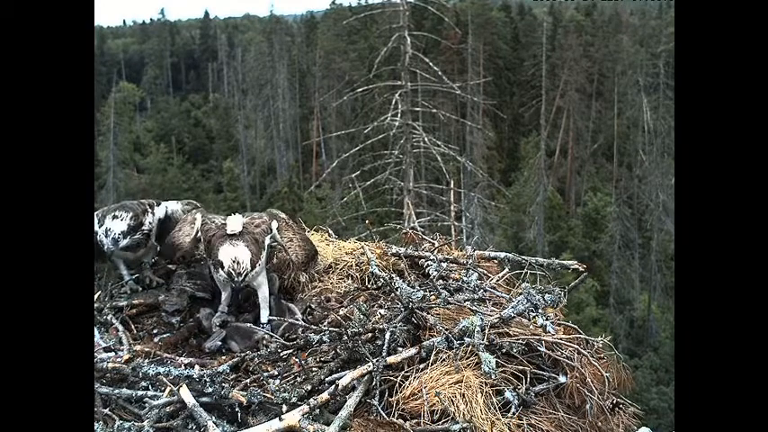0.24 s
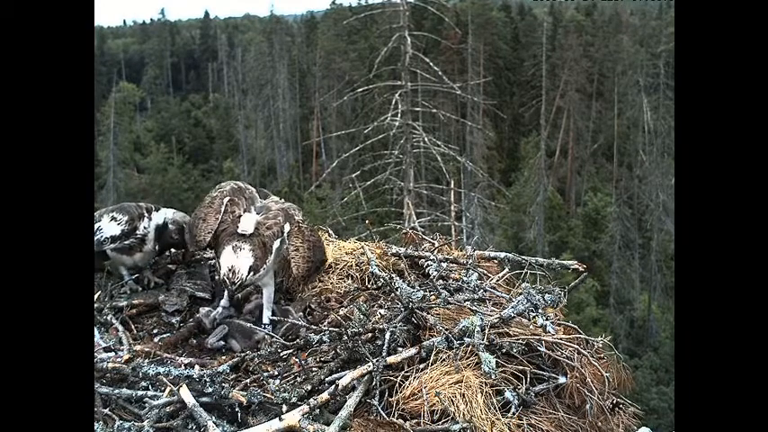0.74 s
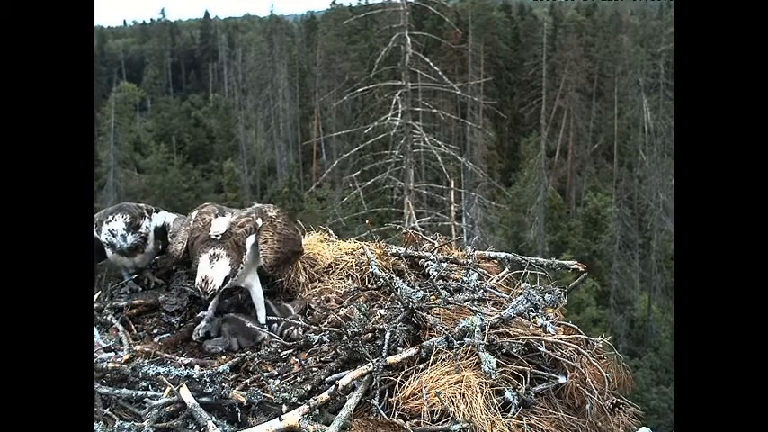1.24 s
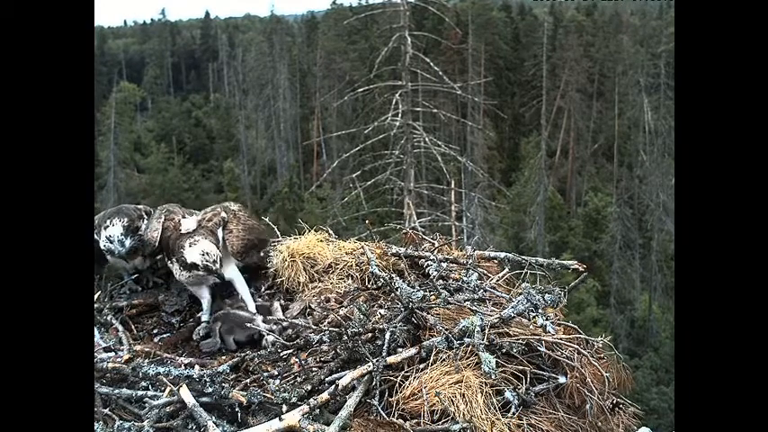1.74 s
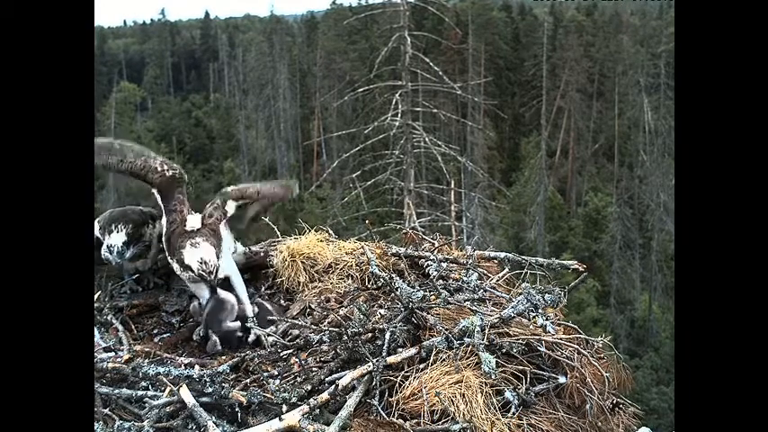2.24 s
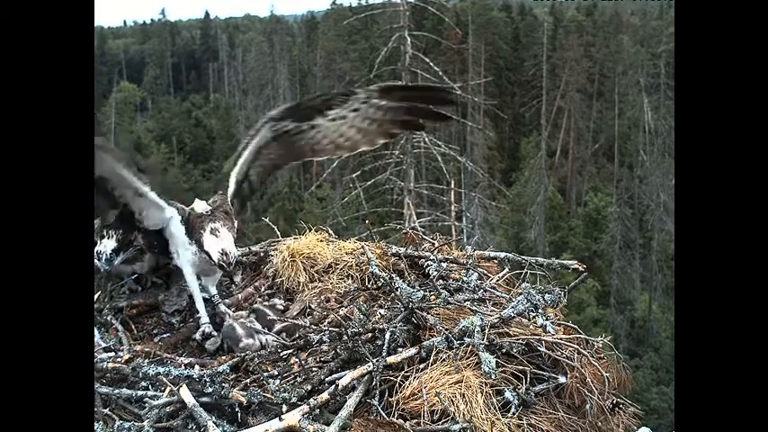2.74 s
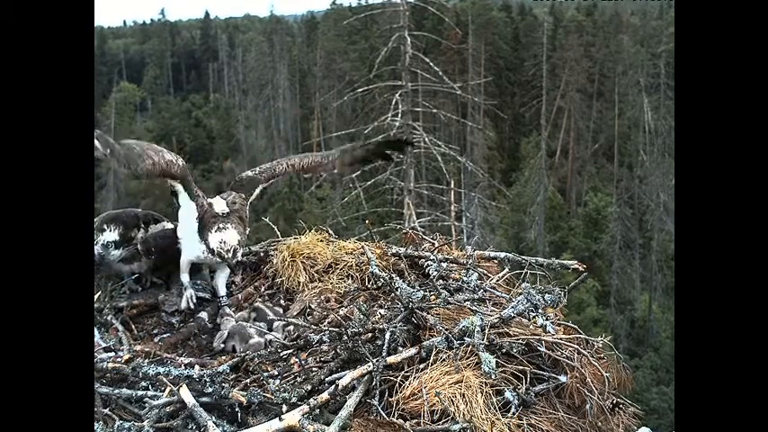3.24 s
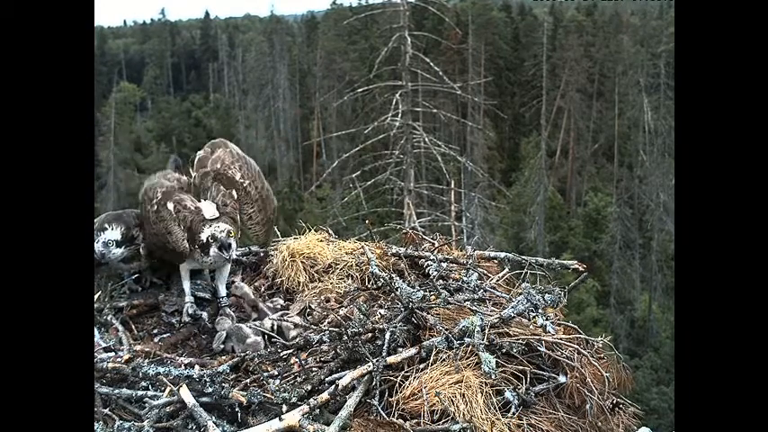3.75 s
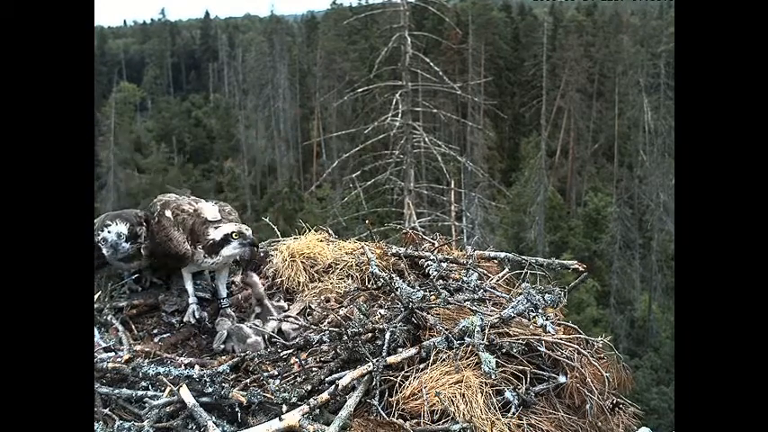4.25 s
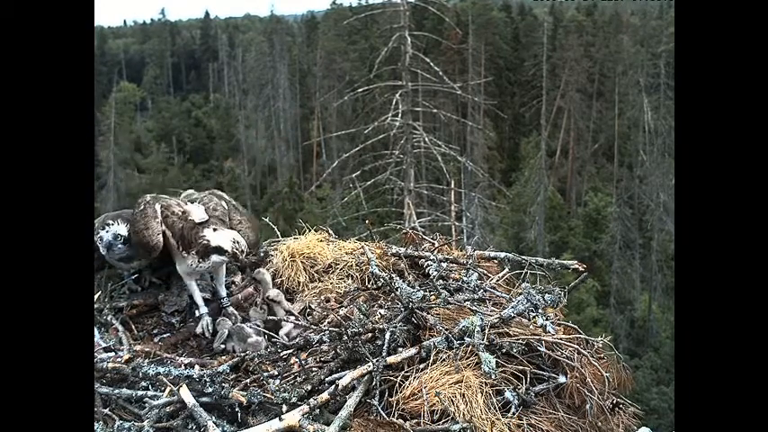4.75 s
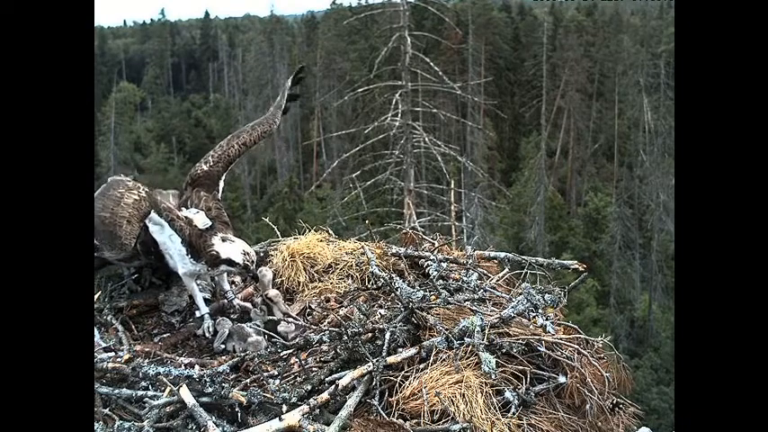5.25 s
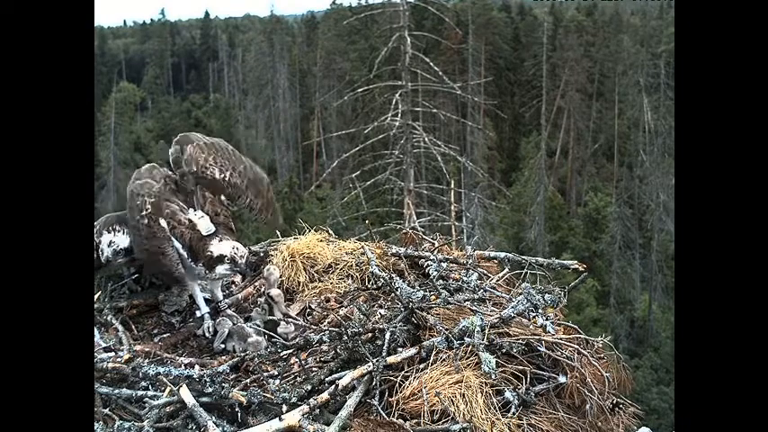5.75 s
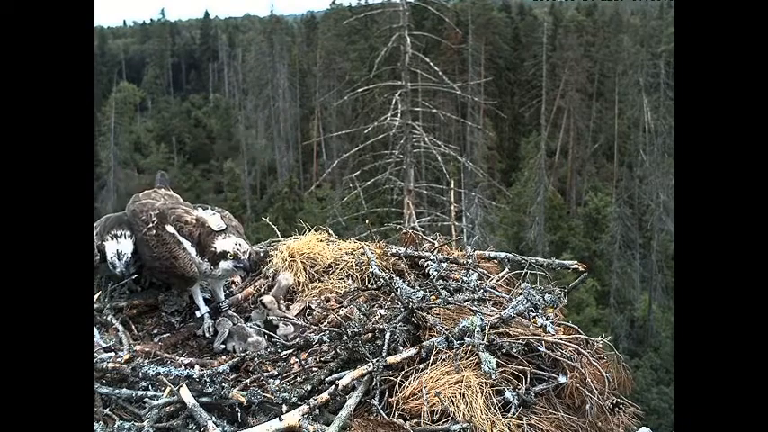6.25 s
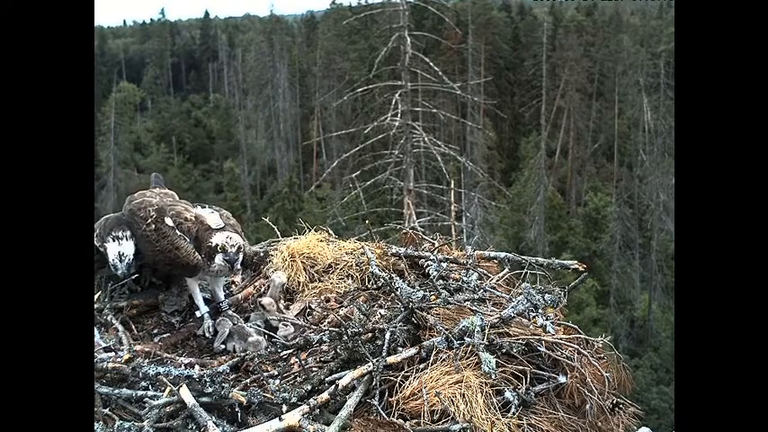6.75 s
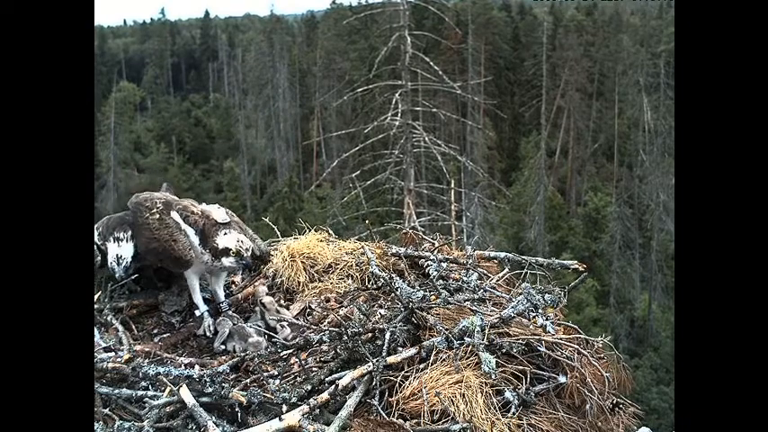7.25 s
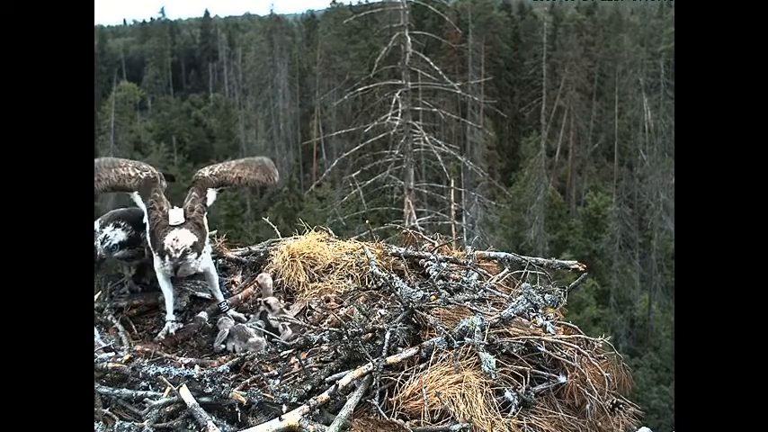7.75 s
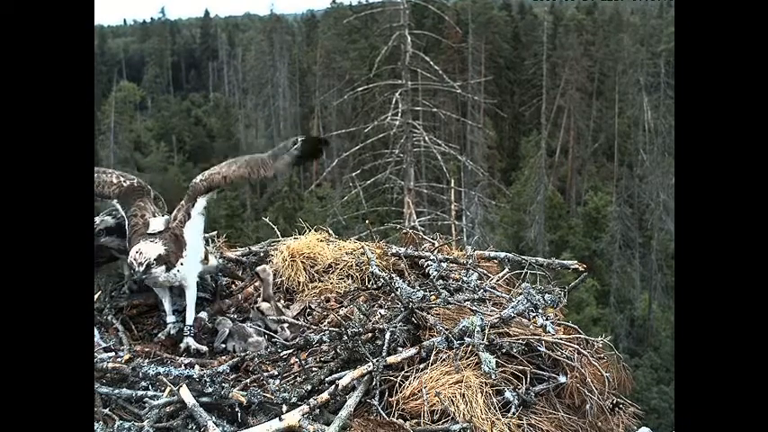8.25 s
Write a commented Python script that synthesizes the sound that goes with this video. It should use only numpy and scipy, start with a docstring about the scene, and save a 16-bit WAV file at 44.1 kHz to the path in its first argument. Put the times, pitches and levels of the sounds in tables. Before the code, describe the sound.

Ospreys call close by on a stick nest in a forest. A sharp yelp opens, then a quick run of soft chips and peeps leads to a loud scream that slurs downward. Two more screams and a held yelp follow, with fewer chips between, and three short yelps finish. Twigs snap and rustle underfoot and faint wind hisses in the trees. The narrow-band microphone fizzes slightly on the loudest whistles.

```python
"""A sharp yelp, then runs of soft chips and peeps between loud slurred screams: ospreys on a nest.
Each call is a whistle of the syrinx, some of them hoarse; short rough bursts of noise fall among them.
Twigs snap, scrape and rustle underfoot; the trees answer faintly and hiss in a light wind.
A narrow-band nest camera overloads on the loudest whistles and mirrors them around half its sampling rate.
"""
import sys
import numpy as np
from scipy import signal
from scipy.fft import rfft, irfft
from scipy.io import wavfile
from scipy.ndimage import uniform_filter1d, map_coordinates

SR = 44100
rng = np.random.default_rng(int(sys.argv[2]) if len(sys.argv) > 2 else 0)


def digitize_waveform(pressure):
    """Quantize a signal to 16-bit integers and store it at the path in sys.argv[1].

    Rows of a 2-D input are taken as channels; values are limited to [-1, 1].
    """
    field = np.atleast_2d(pressure).T
    bounded = np.clip(field, -1, 1)
    quanta = np.round(bounded * 32767).astype(np.int16)
    wavfile.write(sys.argv[1], SR, quanta)


N = 374850


def amp(db):
    """Decibels to gain."""
    return 10 ** (np.asarray(db) / 20)


def unit(x):
    """Scaled to rms 1."""
    return x / np.sqrt(np.mean(x ** 2) + 1e-20)


def along(points, hz):
    """Read a curve of (f/Hz, value) points on a log frequency axis."""
    f, v = np.transpose(points)
    return np.interp(np.log(hz + 1), np.log(f + 1), v)


def wobble(rate, n):
    """A smooth random curve of n samples, rate knots a second."""
    knots = rng.standard_normal(int(n * rate / SR) + 4)
    return map_coordinates(knots, [np.arange(n) * rate / SR])


def eq(x, points):
    """Shape x with a curve of (f/Hz, level/dB) points."""
    return irfft(rfft(x) * amp(along(points, np.fft.rfftfreq(N, 1 / SR))), N)


def noise(points):
    """Noise of rms 1 with the given EQ."""
    return unit(eq(rng.standard_normal(N), points))


def add(track, s, sound):
    """Mix a sound into the track at s seconds."""
    start = max(round(s * SR), 0)
    track[start:start + len(sound)] += sound[:N - start]


def excerpt(source, s, n):
    """n samples of a running noise from s seconds on."""
    return np.resize(source[int(s * SR):], n)


def swell(u):
    """The rounded rise and fall of a soft note, for u from 0 to 1."""
    return np.abs(np.sin(np.pi * u)) ** .7


# Colour of wind in the trees: f/Hz, level/dB
WIND_EQ = [(120, 2), (320, -1), (650, -6.5), (1000, -5), (1800, -14.5), (2600, -1), (4000, -5)]
# Colour of dry twigs, rustling or splintering: f/Hz, level/dB
TWIG_EQ = [(200, -18.5), (700, -12), (1300, 1), (2100, 3.5), (2900, -0.5), (4000, -6.5)]
# Fader moves of the background bed: t/s, wind level/dB, rustle level/dB
BED_FADERS = [(0, -58, -63), (2.701, -54, -54), (3.3, -59, -61.5), (4.8, -57.5, -60), (6.3, -59, -66.5),
              (7.099, -63.5, -68), (8.5, -60, -63)]


def wind_and_rustle():
    """Wind in the trees, and a fine crackle of nest material that swells as the birds shift."""
    s, wind_db, rustle_db = np.transpose(BED_FADERS)
    t = np.arange(N) / SR
    wind = noise(WIND_EQ) * amp(np.interp(t, s, wind_db) + 0.7 * wobble(4.7, N))
    grain = amp(2.5 * wobble(450, N) + 2.8 * wobble(24, N))
    rustle = unit(noise(TWIG_EQ) * grain) * amp(np.interp(t, s, rustle_db))
    return wind + rustle


# Decay of the forest reverb: f/Hz, T60/s
FOREST_DECAY = [(300, .8), (2500, 1.5), (4000, 1.2)]
# Colour of what the trees throw back: f/Hz, level/dB
FOREST_EQ = [(1000, -3), (2600, -3.5), (3400, 1.5), (3900, -2.5)]


def forest_reverb(x):
    """Trunks scatter a long answer, strongest from the nearest row of trees."""
    hz, t, grains = signal.stft(rng.standard_normal(2 * SR), SR, nperseg=256)
    decay = amp(-60 * t / along(FOREST_DECAY, hz)[:, None])
    nearest_row = 1 + np.exp(-((t - .15) / 0.017) ** 2)
    colour = amp(along(FOREST_EQ, hz))[:, None]
    tail = signal.istft(grains * decay * nearest_row * colour, SR, nperseg=256)[1]
    return signal.fftconvolve(x, tail / np.linalg.norm(tail))[:N]


def nest_echo(x, t60_s=0.076, predelay_s=.002):
    """The heap of sticks throws back a brief diffuse echo."""
    t = np.arange(SR // 12) / SR
    tail = rng.standard_normal(len(t)) * amp(-60 * t / t60_s) * (t > predelay_s)
    return signal.fftconvolve(x, tail / np.linalg.norm(tail))[:N]


# Colour of stick rubbing on stick: f/Hz, level/dB
SCRAPE_EQ = [(800, -24), (1800, -3), (2150, 1.5), (2600, -13)]
# Scrape cues: t/s, length/s, level/dB
SCRAPE_CUES = [(4.703, 0.088, -49), (7.338, 0.058, -52), (7.921, 0.037, -53.5)]


def stick_scrapes():
    """A stick slides in small jerks and squeaks faintly at its own pitch."""
    out, wood = np.zeros(N), noise(SCRAPE_EQ)
    for s, length, db in SCRAPE_CUES:
        u = np.linspace(0, 1, int(length * SR))
        jerks_db = 3.5 * wobble(170, len(u))
        add(out, s, amp(db + jerks_db) * swell(u) * excerpt(wood, s, len(u)))
    return out


# Twigs snapping underfoot: t/s, click level/dB
SNAP_CUES = [(0.7698, -34), (1.9961, -32), (3.1185, -35.5), (3.1741, -36.5), (3.4184, -35), (4.7543, -35),
             (5.6265, -39.5), (7.2094, -31), (7.3448, -40), (7.602, -38.5), (7.896, -37)]


def twig_snaps(click_s=0.00016, ring_t60_s=.04, splinter_t60_s=0.044):
    """A dry stick breaks with one sharp click; its fibres splinter and it rings briefly."""
    out, wood = np.zeros(N), noise(TWIG_EQ)
    t = np.arange(SR // 10) / SR - 2 * click_s
    after = np.maximum(t, 0)
    click = 2 * t / click_s * np.exp(.5 - 2 * (t / click_s) ** 2)
    for s, db in SNAP_CUES:
        ring_hz = 2150 * np.exp(.04 * rng.standard_normal())
        ring = np.sin(2 * np.pi * ring_hz * after) * amp(-13.5 - 60 * after / ring_t60_s)
        splinters = excerpt(wood, s, len(t)) * amp(-9.5 - 60 * after / splinter_t60_s) * (t > 0)
        add(out, s + t[0], amp(db) * (click + splinters + ring))
    return out


def syrinx(hz, rough, overtone_db, flutter_hz):
    """A whistle with a weak octave; roughness shakes its pitch and strength."""
    n = len(hz)
    phase = 2 * np.pi * np.cumsum(hz + flutter_hz * rough * wobble(1100, n)) / SR
    strength = (1 + rough * wobble(700, n)) / np.sqrt(1 + rough ** 2)
    return strength * (np.sin(phase) + amp(overtone_db) * np.sin(2 * phase))


# Colour of the rough noise: f/Hz, level/dB
RATTLE_EQ = [(500, -24.5), (1700, -3.5), (2400, -3), (3300, 1.5)]


def rough_noise(pulse_hz=526, jitter=0.23, sharpness=0.37):
    """Noise that rattles in fast uneven pulses; in chips and peeps it is the flapping of the syrinx."""
    pulses = np.cumsum(pulse_hz * np.exp(jitter * wobble(pulse_hz / 2, N))) / SR
    return unit(noise(RATTLE_EQ) * np.exp(sharpness * np.cos(2 * np.pi * pulses)))


# Noise burst cues: t/s, length/s, level/dB
BURST_CUES = [(0.174, 0.056, -42), (.686, .02, -37), (0.719, 0.021, -40.5), (1.213, 0.055, -37.5),
              (1.772, 0.029, -36.5), (1.833, 0.06, -30.5), (2.594, 0.0074, -25.5), (3.853, 0.065, -32.5),
              (4.318, 0.0053, -28.5), (4.643, 0.0071, -41), (6.587, 0.039, -35.5)]


def noise_bursts(rattle):
    """Short rough bursts of noise; two lead into the screams."""
    out = np.zeros(N)
    for s, length, db in BURST_CUES:
        u = np.linspace(0, 1, int(length * SR))
        flicker_db = 2.8 * wobble(400, len(u))
        add(out, s, amp(db + flicker_db) * swell(u) * excerpt(rattle, s, len(u)))
    return out


# Soft rising peeps: t/s, length/s, start f/Hz, crest f/Hz, crest time/length, level/dB, roughness/0-1
PEEP_CUES = [ (0.43, 0.041, 2010, 3090, 0.48, -40.5, .45), (0.939, 0.045, 2010, 3100, 1.6, -40.5, 0.23),
             (1.359, 0.033, 2530, 3440, 1.3, -44.5, 0.42), (1.8, 0.025, 3100, 4200, 2.4, -38.5, 0.4),
             (1.989, 0.043, 1400, 4380, 1.64, -38, 0.5), (2.252, .02, 1584, 4250, 1.64, -43.5, 0.32),
             (2.688, 0.068, 2450, 2996, 0.31, -39, 0.2), (4.174, 0.036, 2050, 2990, 0.96, -33.5, 0.17),
             (4.201, 0.057, 2900, 3300, 1.3, -43.5, 0.45), (4.989, 0.044, 1402, 1903, 0.48, -35.5, 0.04), ]


def peeps(rattle):
    """A peep climbs an arch of pitch; some stop on the way up, some come down again, rough ones hiss."""
    out = np.zeros(N)
    for s, length, start_hz, crest_hz, crest_at, db, rough in PEEP_CUES:
        u = np.linspace(0, 1, int(length * SR))
        pitch = crest_hz - (crest_hz - start_hz) * (u / crest_at - 1) ** 2
        tone = (1 - rough ** 2) * syrinx(pitch, rough, overtone_db=-13.5, flutter_hz=450)
        air = 0.8 * rough * excerpt(rattle, s, len(u))
        add(out, s, amp(db) * swell(u) * (tone + air))
    return out


# Soft falling chips: t/s, length/s, start f/Hz, end f/Hz, level/dB, hang (1 slides, more holds and dives)
CHIP_CUES = [ (.274, 0.017, 3240, 1440, -37.5, 1.8), (.494, .016, 3610, 2620, -22.5, 4),
             (0.545, 0.012, 2860, 1870, -41, 1), (.978, 0.033, 3240, 2200, -32.5, 4.3),
             (1.044, 0.026, 3660, 1390, -35, 1.7), (1.21, .011, 3410, 1940, -28.5, 1.5),
             (1.27, 0.0072, 3840, 2900, -33, 1.3), (1.342, 0.018, 3300, 1210, -34, 1.14),
             (1.393, 0.016, 3400, 2160, -35, 2.1), (1.634, 0.023, 3466, 1370, -27.5, 1.29),
             (1.831, 0.0058, 4164, 3000, -22, 1.7), (1.88, .03, 3410, 1200, -27, 1.5),
             (2.069, 0.0038, 3795, 2860, -29, 1.3), (2.122, 0.027, 3530, 1237, -28.5, 1.29),
             (2.344, 0.0098, 4170, 2890, -20, 2.4), (2.378, .011, 3070, 1870, -28.5, 1.64),
             (2.406, .022, 3030, 1274, -27.5, 1.15), (2.77, .017, 3220, 2000, -30.5, 2.8),
             (3.662, 0.034, 3600, 2950, -33, 0.67), (3.733, 0.033, 3630, 1090, -45, 1.46),
             (4.253, .02, 3095, 2400, -28.5, 3.3), (4.306, 0.022, 2655, 1754, -35.5, 1.4),
             (4.596, 0.0091, 3025, 2000, -31.5, 1.47), (4.632, .022, 2567, 902, -38.5, 1.09),
             (4.947, 0.019, 2114, 1813, -41.5, 1.43), ]


def chips(rattle, break_at=0.41, break_s=0.0014):
    """A chip hangs and swells, then breaks as its pitch tumbles; deeper falls are scratchier."""
    out = np.zeros(N)
    for s, length, start_hz, end_hz, db, hang in CHIP_CUES:
        u = np.linspace(0, 1, int(length * SR))
        fall = u ** hang
        glide = fall - 0.039 * np.sin(2 * np.pi * fall)  # the pitch flips over, then eases off
        pitch = start_hz + (end_hz - start_hz) * glide
        depth = min(np.log2(start_hz / end_hz), 1)  # octaves fallen, capped at one
        rough = depth * np.interp(u, [0, 1], [.68, .35])
        voice_break = depth * np.exp(-((u - break_at ** (1 / hang)) * length / break_s) ** 2)
        tone = (1 - .5 * voice_break) * syrinx(pitch, rough, overtone_db=-11, flutter_hz=295)
        air = (.7 * rough + 0.26 * voice_break) * excerpt(rattle, s, len(u))
        add(out, s, amp(db) * swell(u ** (hang ** .62)) * (tone + air))
    return out


def loud_call(s, pitch, puff_db, hiss, puff, crack_s=.011):
    """A loud call cracks open roughly with a low puff, then turns pure; a faint hiss is laid under it."""
    n = len(pitch)
    crack = np.exp(-(np.arange(n) / SR / crack_s) ** 2)
    tone = syrinx(pitch, rough=0.018 + .36 * crack, overtone_db=-15, flutter_hz=325)
    puff_gain = amp(puff_db) * crack
    hiss_gain = amp(-24) + amp(8) * puff_gain
    return tone + hiss_gain * excerpt(hiss, s, n) + puff_gain * excerpt(puff, s, n)


# Held yelps: t/s, length/s, f/Hz, start level/dB, catch depth/0-1, undertone level/dB re the yelp
YELP_CUES = [(0.0326, 0.028, 3415, -10, .05, -37), (5.322, 0.14, 3442, -13, .3, -23),
             (7.687, 0.048, 3236, -18.5, 0, -29.5), (8.067, 0.037, 3278, -18.5, 1, -27.5),
             (8.409, 0.04, 3205, -18.5, .6, -25.5)]


def yelps(hiss, puff, attack_s=0.0041, release_s=0.0084, push_db_per_s=34):
    """A yelp holds its pitch and sags at the end, where the other side of the syrinx peels off below it."""
    sag_share, under_s, overhang_s = .175, 0.019, 0.007
    out, u = np.zeros(N), np.linspace(0, 1, int(under_s * SR))
    for s, length, hz, db, catch_depth, under_db in YELP_CUES:
        t = np.arange(0, length, 1 / SR)
        sag = sag_share * np.exp((t - length) / .028)
        squeak_hz = 1108 * np.exp(-t / .0018)  # drops onto the note from above
        scoop_hz = 330 * np.exp(-t / 0.0056)  # and undershoots it at first
        pitch = hz * (1 - sag) + squeak_hz - scoop_hz
        fades = np.minimum(t / attack_s, 1) * np.minimum((length - t) / release_s, 1)
        catch = catch_depth * np.exp(-((t - 0.017) / 0.0023) ** 2)  # the voice catches after the crack
        level = amp(db + push_db_per_s * t) * fades * (1 - catch)  # the bird pushes harder as it holds
        add(out, s, level * loud_call(s, pitch, puff_db=-25, hiss=hiss, puff=puff))
        under_hz = hz * np.interp(u, [0, 1], [1 - sag_share, .58])
        undertone = swell(u) * syrinx(under_hz, rough=0.29, overtone_db=-23.5, flutter_hz=300)
        under_gain = amp(db + push_db_per_s * length + under_db)
        add(out, s + length + overhang_s - under_s, under_gain * undertone)
    return out


# Slurred screams: puff level/dB re the tone, then breakpoints of (t/s, f/Hz, level/dB)
SCREAM_CUES = [ (-43, [(2.518, 4028, -36), (2.5205, 3940, -20), (2.522, 3810, -12), (2.533, 3167, -7.5),
               (2.539, 2884, -17), (2.552, 2335, -12.5), (2.562, 2116, -20), (2.582, 1787, -20.5),
               (2.6, 1564, -36.5)]), (-23, [(3.883, 3905, -25), (3.897, 3837, -6.5), (3.912, 3635, -4),
               (3.926, 3337, -7.5), (3.944, 2793, -6.5), (3.955, 2466, -13.5), (3.964, 2285, -12.5),
               (3.976, 2182, -17.5), (3.987, 2496, -32)]), (-18, [(6.615, 3985, -29), (6.622, 3940, -8.5),
               (6.634, 3742, -5.5), (6.654, 3486, -7.5), (6.68, 2720, -7.5), (6.691, 2408, -12.5),
               (6.702, 2596, -11), (6.72, 3244, -11.5), (6.725, 3300, -40)]), ]


def screams(hiss, puff):
    """The loudest calls start shrill and slur far downward."""
    out = np.zeros(N)
    for puff_db, breakpoints in SCREAM_CUES:
        s, hz, db = np.transpose(breakpoints)
        t = np.arange(s[0], s[-1], 1 / SR)
        pitch = uniform_filter1d(np.interp(t, s, hz), size=200, mode="nearest")
        level = amp(np.interp(t, s, db)) * signal.windows.tukey(len(t), .03)
        add(out, s[0], level * loud_call(s[0], pitch, puff_db, hiss, puff))
    return out


# Colour of the faint camera hiss that follows each loud call's level: f/Hz, level/dB
CALL_HISS_EQ = [(150, -1.5), (400, 0), (900, -8), (2500, 2.5)]


def calls_and_bursts():
    """The main bus: loud osprey calls with the hiss that follows them, soft calls and noise bursts."""
    hiss = noise(CALL_HISS_EQ)
    puff = noise([(330, -2.5), (900, -31)])
    rattle = rough_noise()
    return screams(hiss, puff) + yelps(hiss, puff) + chips(rattle) + peeps(rattle) + noise_bursts(rattle)


def scene():
    """Birds and twigs up front, with faint sends to nest and forest, over the background bed."""
    near = calls_and_bursts() + twig_snaps() + stick_scrapes()
    echoes = amp(-27) * nest_echo(near) + amp(-39.5) * forest_reverb(near)
    return (near + echoes + wind_and_rustle())[None]


# Colour of the overload fizz: f/Hz, level/dB
FIZZ_EQ = [(6500, 4.5), (10000, -5.5)]


def overload_fizz(x, release_s=0.021):
    """Bright noise rides the envelope of loud, shrill sound near 4 kHz."""
    shrill = eq(x, [(3480, -42), (3650, -3.5), (4250, -2.5), (4480, -42)])
    pole = np.exp(-1 / (release_s * SR))
    envelope = signal.lfilter([1 - pole], [1, -pole], np.abs(shrill))
    return np.abs(envelope) ** 1.7 * eq(rng.standard_normal(N), FIZZ_EQ)


# The camera's response, which lets some mirrored sound through: f/Hz, level/dB
CAMERA_EQ = [(30, -47), (150, -29), (280, -8), (450, 6.5), (680, 4.5), (1000, -3.5), (2900, -1.5),
             (3400, -1.5), (4000, -7), (4350, -16), (4600, -22.5), (5000, -39.5), (5700, -72),
             (12000, -100), (14400, -100), (15000, -63.5)]
# Colour of the output stage's fizz and distortion: f/Hz, level/dB
OVERLOAD_EQ = [(60, -16), (300, 0.5), (10000, 1), (11300, -37.5)]


def record(dry, rate_hz=8000, ceiling=0.4, top_hz=15500):
    """The camera clips unevenly at a low sampling rate: overtones fold down, whistles gain mirror images."""
    count = round(N * rate_hz / SR)
    lowpassed = eq(dry[0], [(3900, 1), (4900, -46.5)])
    sampled = map_coordinates(lowpassed, [np.arange(count) * N / count])
    clipped = np.clip(sampled, -.38, .5)
    hz = np.fft.rfftfreq(N, 1 / SR)
    images = np.fft.fft(clipped)[np.arange(len(hz)) % count] * N / count  # repeats every rate_hz
    camera = irfft(images * amp(along(CAMERA_EQ, hz)), N)
    # the output stage clips and bends the peaks, fizzes and hisses faintly
    distortion = np.clip(camera, -ceiling, ceiling) - camera - .6 * camera ** 3
    overload = eq(overload_fizz(camera) + distortion, OVERLOAD_EQ)
    hiss = amp(-91.5) * noise([(5000, -2.5), (9000, -1.5), (10900, -10.5)])
    return irfft(rfft(camera + overload + hiss) * (hz < top_hz), N)[None]


dry = scene()
out = record(dry)
digitize_waveform(out)
```